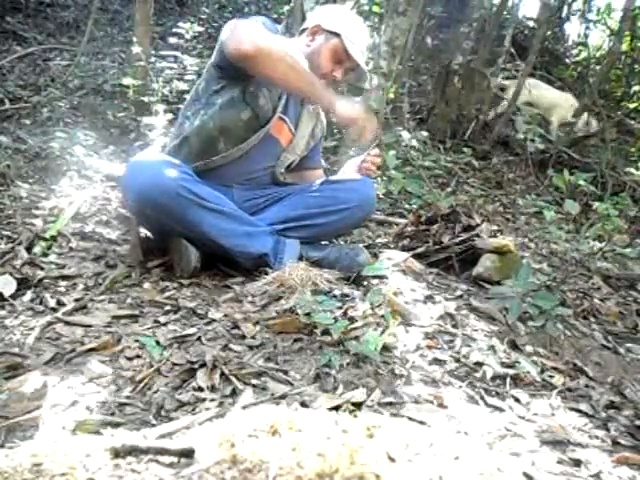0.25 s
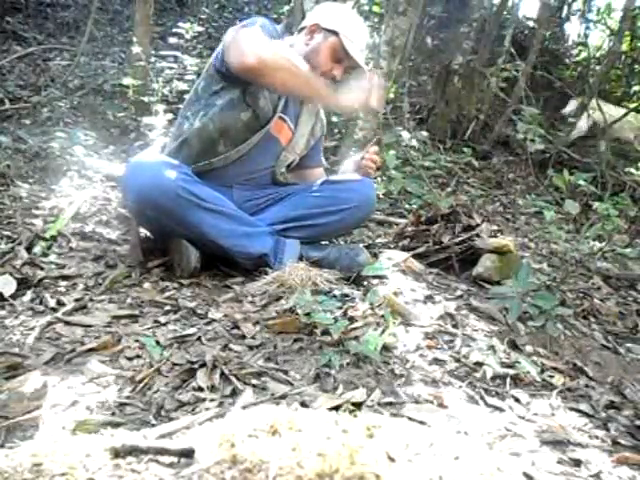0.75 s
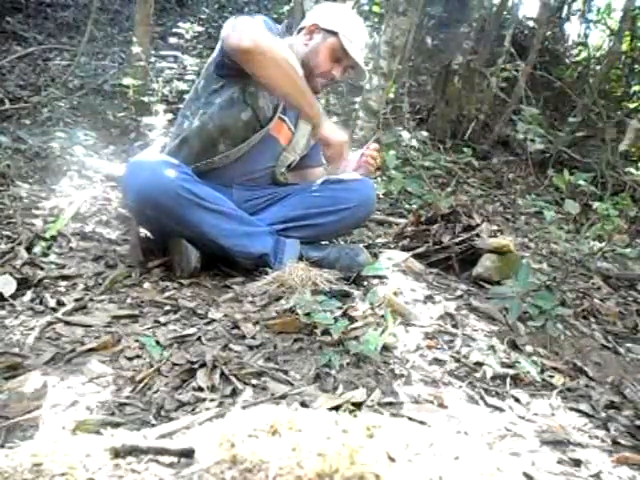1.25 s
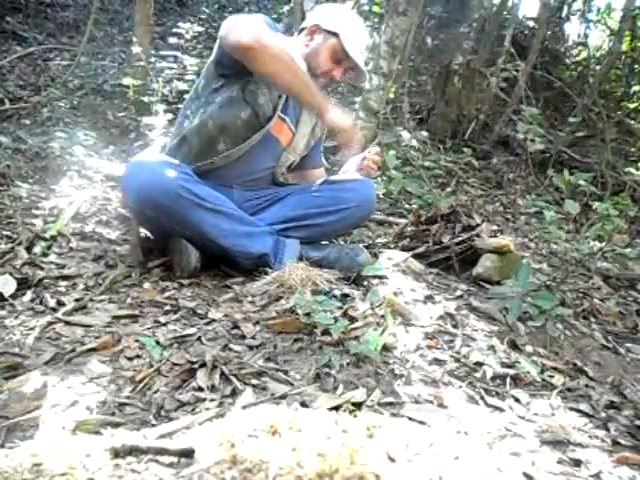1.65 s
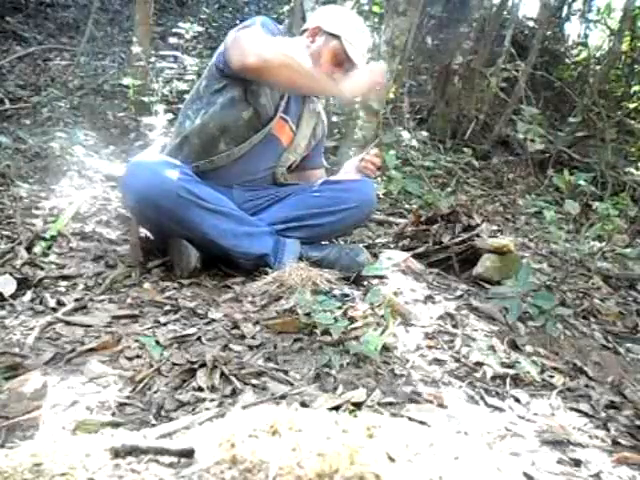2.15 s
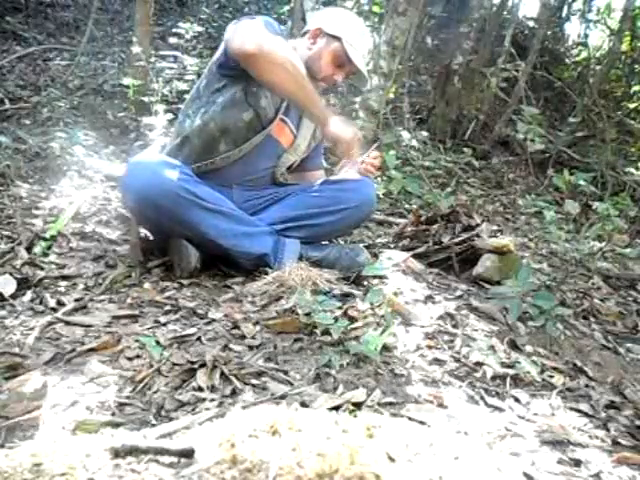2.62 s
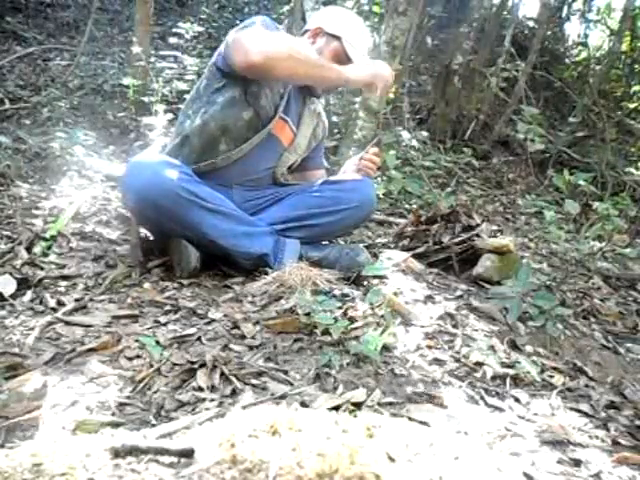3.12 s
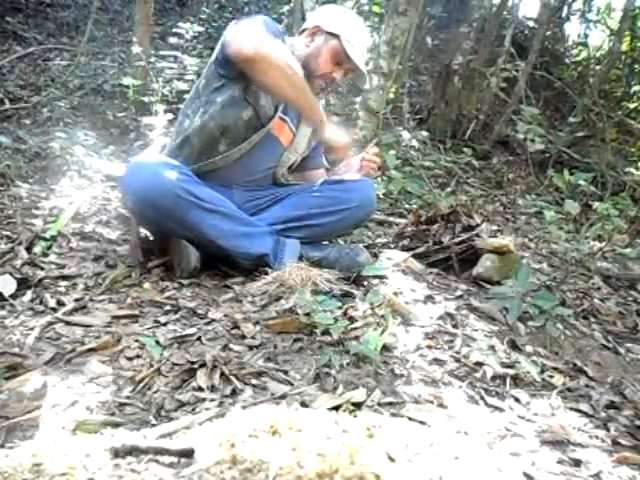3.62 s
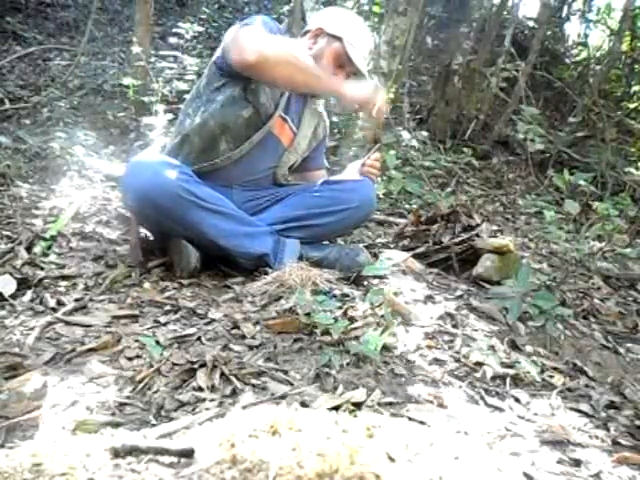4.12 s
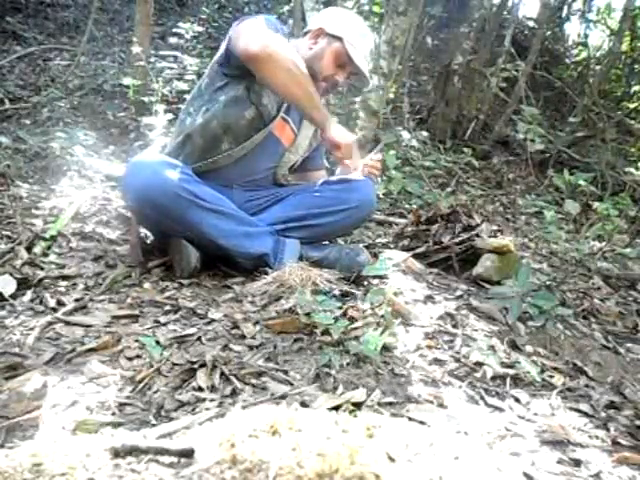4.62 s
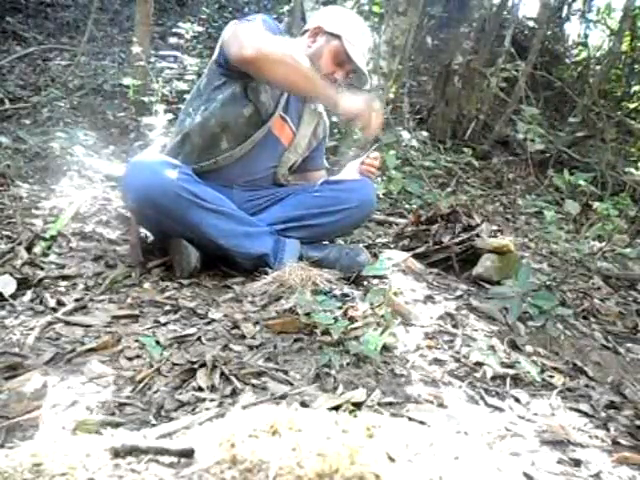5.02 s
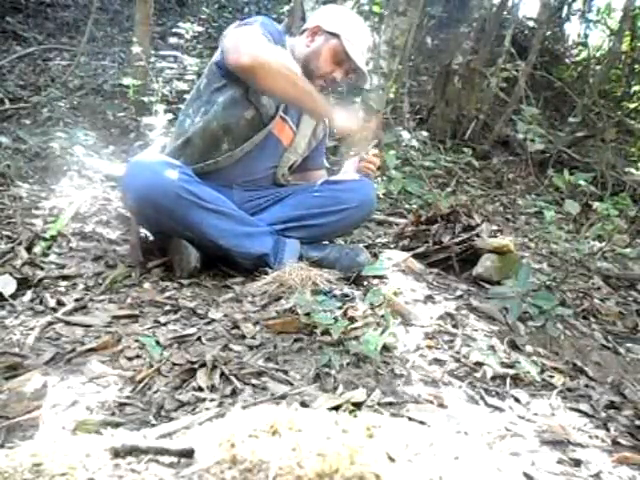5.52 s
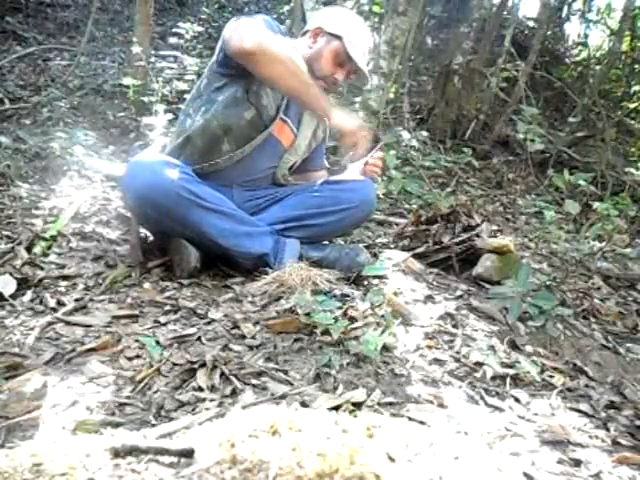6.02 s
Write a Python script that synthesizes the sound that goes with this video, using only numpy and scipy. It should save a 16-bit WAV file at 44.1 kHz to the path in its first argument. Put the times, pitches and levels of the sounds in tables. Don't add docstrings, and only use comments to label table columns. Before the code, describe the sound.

Steady, slightly uneven cracks of steel against stone in a wood, each short, dry and gritty, with faint rustling and microphone hiss.

```python
import sys
import numpy as np
from scipy import signal
from scipy.fft import rfft, irfft
from scipy.io import wavfile
from scipy.ndimage import uniform_filter1d

SR = 44100
rng = np.random.default_rng(int(sys.argv[2]) if len(sys.argv) > 2 else 0)


def to_wav(s):
    ch = np.atleast_2d(s).T
    pcm = np.round(np.clip(ch, -1, 1) * 32767)
    wavfile.write(sys.argv[1], SR, pcm.astype(np.int16))


def natural_amplitude(level_db):
    exponent = np.asarray(level_db, float) / 20
    return 10 ** exponent


N = 276507

MAIN_HZ = 2630
# (f/Hz, level/dB, time to fade 60 dB/s)
FREE_STEEL = [
    (2640, -29, .12),
    (3650, -38, .1),
    (7975, -31, .2),
    (8035, -34, .14),
]


def level(x, db):
    return x * natural_amplitude(db) / np.sqrt(np.mean(x ** 2))


def band(x, lo_hz, hi_hz, order=2):
    return signal.sosfilt(signal.butter(order, [lo_hz, hi_hz], "bandpass", fs=SR, output="sos"), x)


def ring(force, hz, t60, lag=0.):
    pole = np.exp(2j * np.pi * hz / SR - np.log(1000) / (max(t60, .002) * SR))
    swing = signal.lfilter([1], [1, -pole], force.astype(complex))
    return np.real(np.exp(-1j * lag) * swing)


def add(out, s, x):
    i = int(s * SR)
    out[i:i + len(x)] += x[:len(out) - i]


def walk(rate):
    k = int(SR / rate)
    steps = np.repeat(rng.standard_normal(N // k + 1), k)
    return 1.3 * uniform_filter1d(uniform_filter1d(steps, k), k)[:N]


def hiss():
    # (f/Hz, level/dB per Hz)
    hiss_colour = [(12, -34), (20, 5), (513, -2.5), (1370, -8.5), (2530, -8), (7930, -13), (10300, -14),
                   (11500, -29), (15000, -68), (22000, -120)]
    hz, db = np.transpose(hiss_colour)
    f = np.fft.rfftfreq(N, 1 / SR)
    colour = natural_amplitude(np.interp(np.log(f + 1), np.log(hz), db))
    noise = irfft(rfft(rng.standard_normal(N)) * colour, N)
    return level(noise, -53) * natural_amplitude(.2 * walk(3))


def rustle():
    # (t/s, level/dB)
    arm_motion = [(0.0, -57.5), (0.47, -59.5), (0.87, -57.5), (1.68, -58), (2.18, -58.5), (2.53, -54),
                  (2.98, -55), (3.81, -58), (4.3, -56.5), (5.15, -59), (5.52, -56.5), (6.27, -54.5)]
    t = np.arange(N) / SR
    cloth_db = np.interp(t, *np.transpose(arm_motion))
    leaves_db = -61 + 0.36 * (cloth_db - cloth_db.mean()) - .5 * t
    out = np.zeros(N)
    for lo_hz, hi_hz, db in ((196, 560, cloth_db - 7.5), (420, 1240, cloth_db - 5.0),
                             (1270, 2600, leaves_db - 3.5), (2400, 5000, leaves_db - 9.5)):
        patchy = natural_amplitude(db + 2.2 * walk(70))
        out += patchy * level(band(rng.standard_normal(N), lo_hz, hi_hz), 0)
    return out


def knocks_and_ticks():
    # (t/s, peak level/dB, f/Hz, time to fade 60 dB/s)
    small_knocks = [(0.107, -40, 300, 0.018), (1.05, -67, 94.2, 0.03), (2.44, -41, 420, 0.05),
                    (2.878, -40, 574, 0.02), (3.433, -36, 560, 0.013), (3.444, -39.5, 566, 0.022),
                    (4.133, -41.5, 675, 0.041), (4.694, -43.5, 670, 0.025), (5.324, -41, 100, 0.037),
                    (5.339, -40, 257, 0.014), (5.351, -43, 122.3, 0.024), (5.623, -51, 175, 0.028),
                    (5.649, -46, 250, 0.034),
                    (2.6765, -40, 2700, 0.014), (3.4425, -39, 2300, 0.012), (3.436, -44, 1300, 0.018),
                  (6.1812, -36, 2200, .016), (6.1815, -41.5, 880, .02), (1.04, -44, 310, .03),
                  (.806, -38, 400, .03), (3.95, -42, 770, .02), (4.47, -45.5, 600, 0.034),
                  (4.311, -41, 400, .012), (4.604, -33, 556, .03), (4.912, -36, 950, .02),
                  (4.712, -43, 600, 0.024), (1.446, -41, 1600, 0.017), (1.98, -45, 1600, .03),
                    (4.6088, -29, 2750, .022), (4.6090, -33, 5300, .014), (4.6174, -31, 5750, .016),
                   (4.6178, -35, 9700, .016), (4.6222, -35, 3800, .016), (4.9238, -33, 6400, .012),
                   (4.9245, -36, 5200, .025), (4.9240, -38, 9900, .016), (.93, -49, 2500, .03),
                    (5.328, -43, 200, .04), (5.627, -42, 150, .05), (.108, -48, 450, .02)]
    out, t = np.zeros(N), np.arange(4000) / SR
    for s, db, hz, t60 in small_knocks:
        push = (1 + .5 * rng.standard_normal(len(t))) * np.exp(-t * hz * 5)
        knock = ring(push, hz, t60) + 0.28 * ring(push, hz * 0.61, t60) + .5 * ring(push, hz * 1.6, t60)
        knock = band(knock, hz * 0.18, min(hz * 4, SR / 3))
        add(out, s, natural_amplitude(db) * knock / np.abs(knock).max())
    return out


def contact(force, hz, db, t60, free_db, crack):
    lead, grip_s = -.6, 0.0041
    held = sum(natural_amplitude(d) * ring(force, f, fade, lag=lead) for f, d, fade in zip(hz, db, t60))
    held *= np.exp(-(np.arange(len(force)) / SR / grip_s) ** 2)
    free = sum(natural_amplitude(d + share) * ring(force, f, fade)
               for (f, d, fade), share in zip(FREE_STEEL, free_db))
    shock = signal.lfilter([1, 0, -1, -1], [1], force)
    return (held + free + crack * shock) / 3.97


def ring_levels(stone_hz, top_db, high_db):
    # (f/Hz, level/dB, time to fade 60 dB/s)
    held_rings = [(347, -11.5, 0.015), (513, -19, 0.036), (1010, -16.5, 0.016), (1314, -21.5, 0.0094),
                  (2035, -7.5, 0.012), (MAIN_HZ, 0, 0.017), (2955, -3, 0.0067), (3797, -5.5, 0.01),
                  (4190, -4, 0.012), (4530, -7.5, 0.022), (5365, -2.5, 0.017), (5800, -10, 0.023),
                  (6540, -13.5, 0.04), (6950, -6, 0.075), (7960, -15.5, 0.056), (10200, -11.5, .02)]
    stone_db = -4 - 0.21 * top_db
    main_db = -1 + 0.14 * top_db
    thump_db, middle_db = 0.5, -0.2
    hz, db, t60 = np.transpose(held_rings + [(stone_hz, -5 + stone_db, 0.044)])
    groups = [hz < 1200, hz < 2150, hz < 3200, hz < 6000, hz < 7500, hz < 8500]
    db = db + np.select(groups, [thump_db, 0, main_db, middle_db, top_db, high_db], top_db)
    return hz, db, t60, np.array([main_db, middle_db, high_db, high_db])


def strike_and_scrape(t, scrape_db):
    roughness_db = 4.8 * rng.standard_normal(len(t)).clip(-3, 1.3)
    grit = rng.standard_normal(len(t))
    force = natural_amplitude(scrape_db + roughness_db) * grit * np.exp(-(t / 0.0041) ** 3) * 0.26
    force[0] = 1
    return force


def scatter(t):
    # (lowest f/Hz, highest f/Hz, level against the blow/dB, time to fade 60 dB/s)
    echo_bands = [(298, 1420, -31.5, 0.05), (1220, 3900, -24.5, 0.038), (3030, 6600, -22.5, 0.033),
                  (6000, 10800, -29.5, 0.056), (970, 7500, -39.5, 0.29)]
    noise = rng.standard_normal(len(t))
    cloud = np.zeros(len(t))
    for lo, hi, db, fade in echo_bands:
        even = np.sqrt(SR / 2 / (hi - lo))
        cloud += natural_amplitude(db - 60 * t / fade) * band(noise, lo, hi) * even
    return natural_amplitude(4) * cloud * np.clip(t / 0.001, 0, 1)


def hand_jolt(t, bend):
    push_s = 0.00063
    jolt = ring(np.exp(-t / push_s), 322.4 * (1 + 0.13 * bend), 0.021)
    return natural_amplitude(-27) * jolt / np.abs(jolt).max()


def add_skips(out, s, t, bend, hz, ring_db, t60, free_db):
    # (t/s, level/dB, favoured f/Hz, how strongly it is favoured/dB per octave)
    skips = [(.1570, -29, 2750, 15), (0.1588, -26, 3000, 4), (0.494, -16, 3020, 7), (0.805, -16, 1800, 12),
             (1.2087, -18, 2700, 11), (1.5591, -6, 2640, 17), (1.5745, -28, 8000, 20),
             (1.9345, -15.5, 6000, 11), (2.25, -12, 2600, 14), (2.2555, -24, 8000, 14),
             (2.5916, -9.5, 2800, 10), (2.923, -16.5, 3000, 9), (2.93, -29, 3000, 9),
             (3.266, -16.5, 2490, 4), (3.268, -15, 4500, 5), (3.2800, -27, 8000, 20),
             (3.6303, -16, 4500, 3), (3.6440, -25, 8000, 20), (3.9945, -26, 4500, 5),
             (4.2842, -5, 4300, 22), (4.6034, -12, 2800, 8), (4.9107, -14, 2700, 17),
             (4.9150, -19, 5000, 4), (5.223, -13, 4200, 9), (5.224, -17, 2600, 10), (5.5430, -10, 2700, 14),
             (5.5510, -24, 8000, 10), (5.9346, -15.5, 2600, 8), (5.939, -15, 8000, 12)]
    free_hz = np.array(FREE_STEEL)[:, 0]
    touch = np.exp(-t[:len(t) // 3] / .00005) * .5
    pitch = hz * (1 + .006 * np.roll(bend, 3))
    for when, touch_db, favour_hz, slope_db in skips:
        if s < when < s + .1:
            away_db = -slope_db * np.abs(np.log2(hz / favour_hz))
            free_away_db = -slope_db * np.abs(np.log2(free_hz / favour_hz))
            cycles = np.round((when - s - .0006) * MAIN_HZ).clip(2)
            skip = contact(touch, pitch, ring_db + away_db, t60, free_db + free_away_db, crack=0.07)
            add(out, s + .0006 + cycles / MAIN_HZ, natural_amplitude(touch_db) * skip)


def flint():
    # (t/s, peak level/dB, gripped stone f/Hz, level of top rings/dB, level of free high steel ring/dB)
    blows = [(0.155, -13.5, 1770, -2, 6), (0.4898, -19, 1830, 1, 2), (0.8044, -16, 1810, -3, -15),
             (1.206, -13, 1910, 0, -12), (1.557, -9, 1900, 7.5, 4), (1.9321, -17, 1880, 6, 2),
             (2.247, -10, 1670, 0, 8), (2.588, -11, 1660, 2.5, -5), (2.9195, -11, 1820, -1.5, 8),
             (3.263, -10.5, 1830, 5.5, 6), (3.6277, -9.5, 1710, 5.5, 1), (3.9873, -14.5, 1760, -7, -2),
             (4.2832, -20, 1470, -18, 15), (4.6005, -12, 1560, -12, 9), (4.9077, -11, 1780, -3, 11),
             (5.219, -8.5, 1710, 3, 6.5), (5.5392, -10, 1820, -1.5, 0), (5.931, -10.5, 1760, 4, 14)]
    out, hand, t = np.zeros(N), np.zeros(N), np.arange(12000) / SR
    usual_db = np.mean(blows, axis=0)[1]
    for s, db, stone_hz, top_db, high_db in blows:
        hz, ring_db, t60, free_db = ring_levels(stone_hz, top_db, high_db)
        bend = rng.standard_normal(len(hz))
        force = strike_and_scrape(t, -8 - 0.2 * (db - usual_db))
        blow = contact(force, hz * (1 + .012 * bend), ring_db, t60, free_db, crack=0.17)
        add(out, s + .0006, natural_amplitude(db) * (blow + scatter(t)))
        add(hand, s + 0.00093, natural_amplitude(db) * hand_jolt(t, bend[0]))
        add_skips(out, s, t, bend, hz, ring_db, t60, free_db)
    out = signal.sosfilt(signal.butter(2, 8800, fs=SR, output="sos"), out)
    return band(out, 370, 9650) + band(hand, 193, 1260)


def squeaks():
    # (t/s, length/s, start f/Hz, end f/Hz, level/dB)
    rubs = [
        (1.754, .042, 698, 1430, -57),
        (3.015, .044, 2580, 2560, -55),
    ]
    out, attack_s = np.zeros(N), 0.0096
    for s, length, start_hz, end_hz, db in rubs:
        now = np.arange(0, length, 1 / SR)
        swell = np.clip(np.minimum(now, 2 * (length - now)) / attack_s, 0, 1) ** 2
        wobble = uniform_filter1d(rng.standard_normal((2, len(now))), size=60)
        pitch = (start_hz + (end_hz - start_hz) * now / length) * (1 + 0.38 * wobble[0])
        tone = np.sqrt(2) * np.sin(2 * np.pi * np.cumsum(pitch) / SR)
        add(out, s, swell * natural_amplitude(db + 31 * wobble[1] - 0.5) * tone)
    return out


def scene():
    mono = hiss() + rustle() + knocks_and_ticks() + flint() + squeaks()
    return np.tile(mono, (2, 1))


def top_cut(x):
    return signal.sosfilt(signal.butter(12, 11880, fs=SR, output="sos"), x)


def record(dry):
    treble = band(dry, 3900, 22000)
    loud = uniform_filter1d(np.abs(treble[0]), size=130)
    coming = uniform_filter1d(np.roll(loud, -int(0.0056 * SR)), size=120)
    starved = np.clip(coming / natural_amplitude(-29), 0, .9) * (loud < natural_amplitude(-50))
    high_pass = signal.butter(2, 2000, "highpass", fs=SR, output="sos")
    in_step_treble = signal.sosfiltfilt(high_pass, dry)
    rough = natural_amplitude(-25) * loud * (loud > natural_amplitude(-46)) * rng.standard_normal(N)
    unlike = band(rough, 900, 12000) * np.array([[1], [-1]])
    x = dry - starved * in_step_treble + unlike
    cut = signal.firwin(161, 10940, window=("kaiser", 7), fs=SR)
    return top_cut(signal.fftconvolve(x, cut[None], mode="same"))


dry = scene()
out = record(dry)
to_wav(out)
```